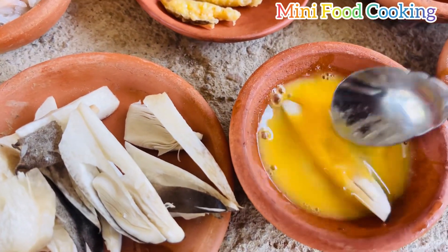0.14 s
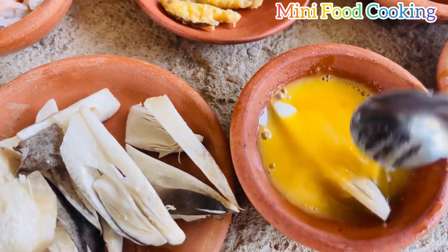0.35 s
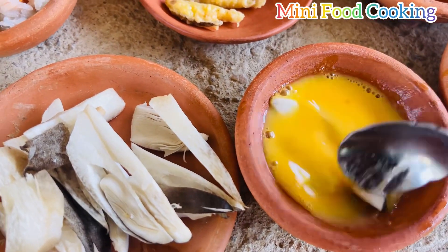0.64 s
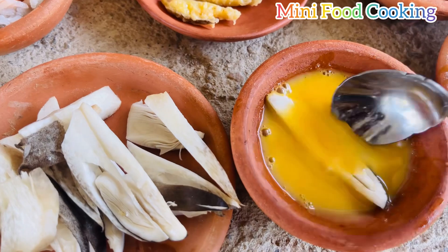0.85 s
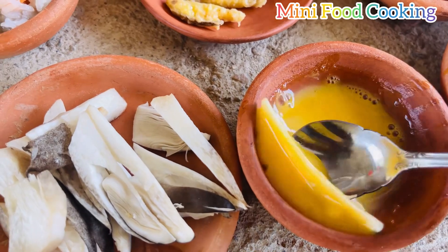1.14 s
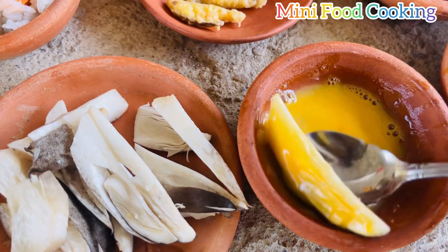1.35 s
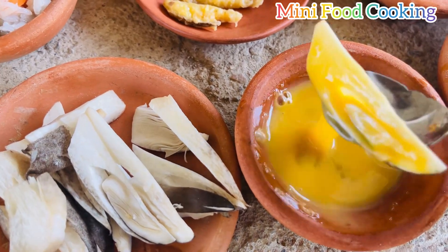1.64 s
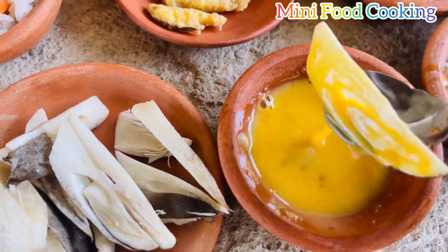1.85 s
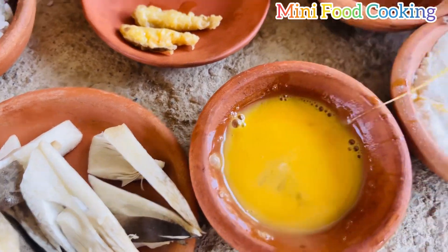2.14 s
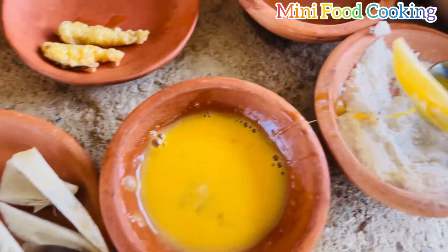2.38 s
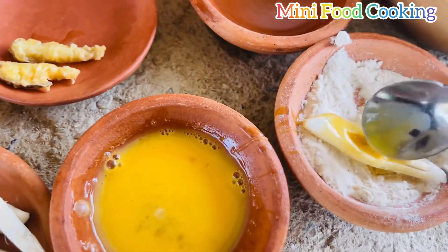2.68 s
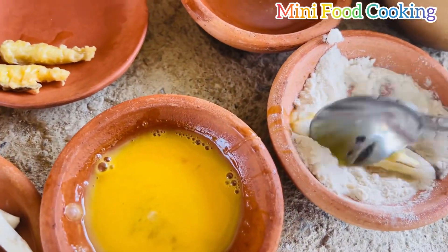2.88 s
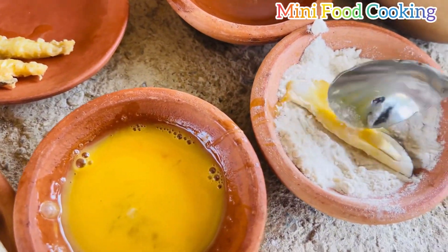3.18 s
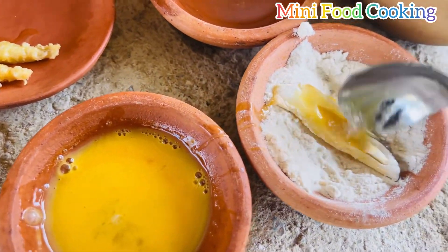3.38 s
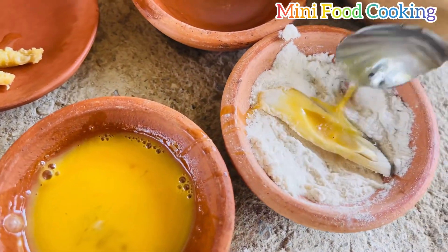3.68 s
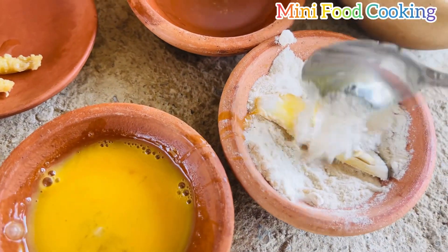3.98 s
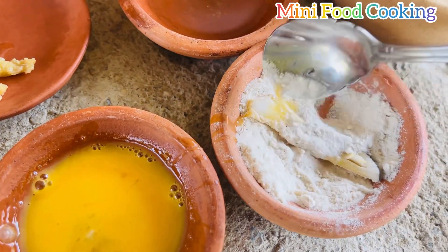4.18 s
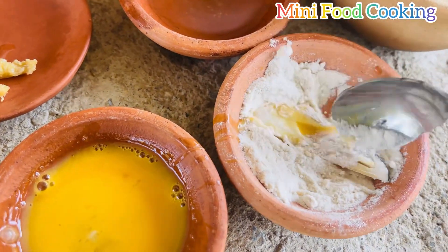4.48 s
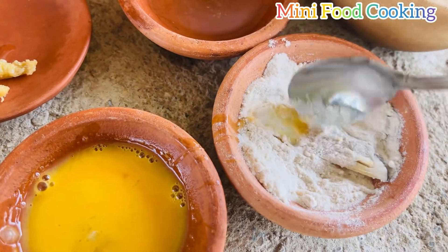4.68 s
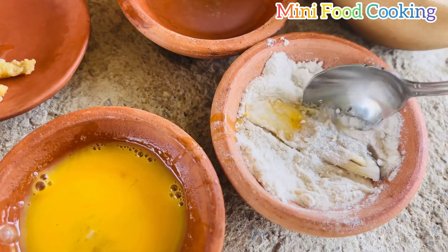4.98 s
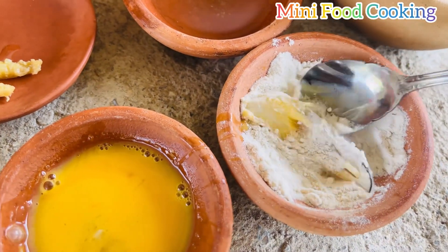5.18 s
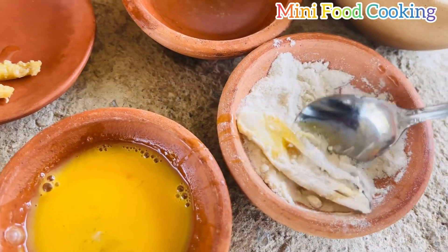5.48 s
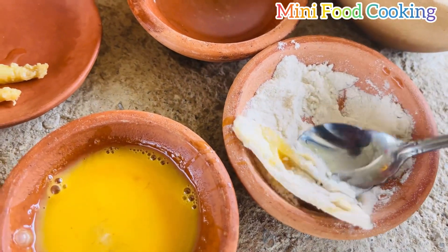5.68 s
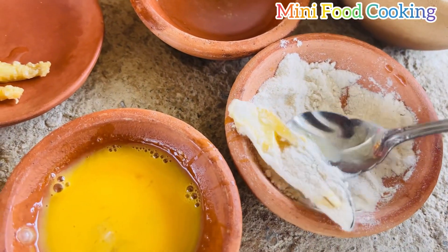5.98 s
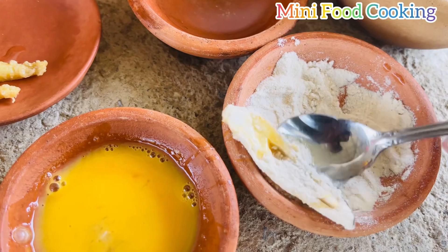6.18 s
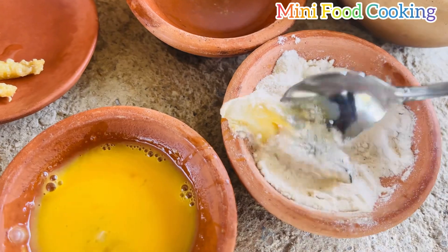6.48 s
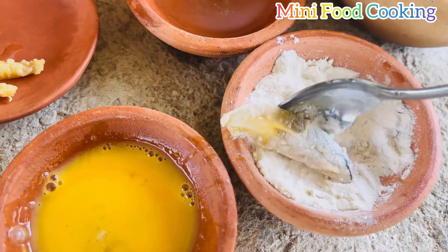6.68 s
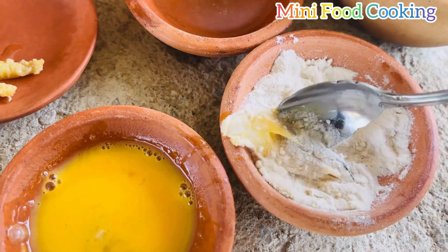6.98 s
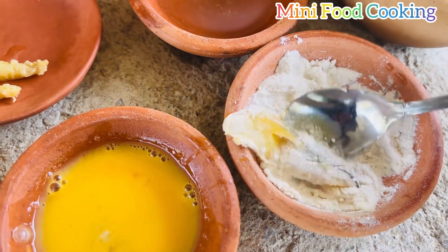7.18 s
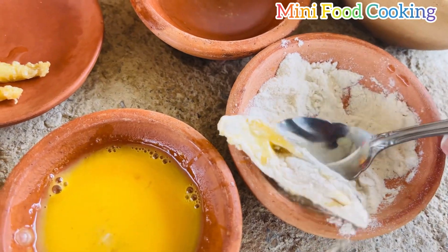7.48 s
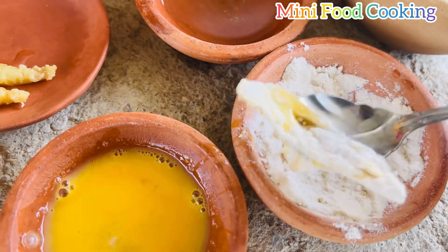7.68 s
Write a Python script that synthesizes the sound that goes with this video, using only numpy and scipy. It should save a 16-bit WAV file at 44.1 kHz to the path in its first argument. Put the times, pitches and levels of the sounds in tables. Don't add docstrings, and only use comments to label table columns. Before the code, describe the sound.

A wide outdoor stereo scene of many birds in woodland, some close and clear, others deep in leaves. Piercing whistles come first, then repeated slurred chirps on the left, scattered softer notes, a burst of strong calls midway, an even trill and a last few high whistles. Distant birdsong swells and fades over a soft leafy hiss; frog croaks are almost buried. The sound is thin, without bass.

```python
import sys
import numpy as np
from scipy import signal
from scipy.fft import rfft, irfft, next_fast_len
from scipy.io import wavfile
from scipy.ndimage import uniform_filter1d

SR = 44100
rng = np.random.default_rng(int(sys.argv[2]) if len(sys.argv) > 2 else 0)


def output_pcm(signal):
    pcm = np.clip(np.atleast_2d(signal).T, -1, 1) * 32767
    wavfile.write(sys.argv[1], SR, np.round(pcm).astype(np.int16))


def invert_db(x):
    u = np.asarray(x, float) / 20
    return 10 ** u


N = 345744

LEFT_PAN_DB, FRONT_PAN_DB, AHEAD_PAN_DB, RIGHT_PAN_DB = 9, 1, -2, -8.5
BURR = .012


def rms_one(x):
    return x / np.sqrt(np.mean(x ** 2) + 1e-20)


def add(bus, start_s, sound, pan_db):
    at = max(round(start_s * SR), 0)
    sound = sound[:max(N - at, 0)]
    ears = invert_db(np.array([[pan_db / 2], [-pan_db / 2]]))
    bus[:, at:at + len(sound)] += sound * ears


def whistle(s, hz, db, fade_s, warble=0., burr=0., depth=0.):
    s = np.sort(s)
    t = s[0] + np.arange(int((s[-1] - s[0]) * SR)) / SR
    pitch = np.interp(t, s, hz)
    pitch = uniform_filter1d(pitch, size=max(len(t) // 16, 1), mode="nearest")
    waver = np.sin(2 * np.pi * 71 * t + hz[0]) * np.sin(2 * np.pi * 23 * t + hz[-1])
    flutter = np.interp(t, s, depth * np.ones(len(s))) * np.sin(2 * np.pi * warble * t)
    pitch = pitch * (1 + flutter + 2.3 * burr * waver)
    ends = np.clip(np.minimum(t - s[0], s[-1] - t) / fade_s, 0, 1)
    envelope = invert_db(np.interp(t, s, db)) * np.sin(np.pi / 2 * ends) ** 2
    return envelope * np.sin(2 * np.pi * np.cumsum(pitch) / SR)


def song(shape, calls, pan_db, pitch=1):
    bus = np.zeros((2, N))
    s, hz, db = np.transpose(shape)
    for (start, level_db), factor in zip(calls, pitch * np.ones(len(calls))):
        note = whistle(s, hz * factor, db + level_db, min(.003, s[-1] / 3))
        add(bus, start + s[0], note, pan_db)
    return bus


# (t/s, length/s, f/Hz, level/dB)
LEFT_HELD = [(0.14, 0.12, 5460, -42.5), (.2, .14, 4700, -59.5), (1.5, .2, 4200, -60.5),
             (1.74, .12, 4350, -64), (3.79, .1, 6130, -69), (3.83, .08, 4900, -66.5),
             (2.67, 0.076, 7050, -62.5), (3.11, 0.071, 2760, -60.5), (3.23, 0.042, 4600, -72.5),
             (2.0, 0.23, 2900, -65.5), (2.12, 0.12, 3300, -69.5), (1.0, 0.041, 1980, -71.5),
             (2.34, .14, 6865, -64), (.3, 0.11, 3560, -58.5), (4.33, .02, 8800, -63),
             (3.73, 0.2, 4450, -61.5), (3.99, 0.15, 4860, -57.5), (4.03, .1, 5200, -57),
             (4.33, 0.31, 8855, -70.5), (4.68, 0.079, 3370, -45), (4.82, 0.05, 3550, -47.5),
             (4.77, 0.045, 3420, -53), (4.88, 0.046, 3500, -52.5), (5.69, 0.11, 4240, -57.5),
             (5.91, 0.085, 6200, -62), (7.07, .1, 5070, -65), (6.57, 0.046, 4600, -56.5),
             (6.85, .1, 5100, -62), (7.47, 0.064, 4550, -62), (7.67, .15, 3880, -67.5),
             (8.1, 0.11, 3650, -61.5), (7.25, 0.11, 3700, -59.5)]
FRONT_HELD = [(0.0, 0.03, 7130, -41), (0.74, 0.075, 2750, -49), (2.33, 0.051, 3000, -56.5),
              (2.39, 0.09, 3030, -52), (2.5, .1, 2980, -58.5), (3.35, 0.22, 3582, -55.5),
              (3.86, 0.13, 4090, -51.5), (4.0, .14, 4100, -60), (3.89, 0.039, 6170, -58.5),
              (3.91, 0.029, 6660, -61), (4.14, 0.067, 6980, -55), (4.357, 0.012, 8000, -44),
              (4.38, 0.15, 8000, -64.5), (0.015, .04, 4540, -64.5), (.17, 0.075, 2880, -53.5),
              (5.775, 0.014, 3430, -52), (4.77, 0.07, 6590, -48), (5.41, 0.071, 3166, -47),
              (6.64, 0.12, 4275, -54.5), (6.73, 0.046, 3060, -51.5), (6.83, 0.14, 3690, -54),
              (7.0, 0.077, 2386, -63), (7.0, 0.16, 3006, -57), (7.42, .11, 2964, -56.5),
              (7.625, 0.05, 6900, -58), (7.72, 0.039, 2790, -59), (7.77, 0.073, 2980, -59)]
RIGHT_HELD = [(0.8, 0.093, 3610, -55.5), (1.0, 0.13, 4200, -60), (1.01, 0.072, 3167, -52.5),
              (1.32, .04, 3360, -51), (1.36, 0.072, 2950, -51), (1.8, 0.092, 3175, -56.5),
              (1.675, .045, 3610, -57), (3.0, 0.037, 5480, -54.5), (4.01, 0.039, 5186, -43),
              (5.86, 0.15, 3420, -53)]
# (t/s, length/s, first f/Hz, last f/Hz, level/dB)
LEFT_SETTLING = [(0.49, 0.15, 7100, 6800, -60), (1.634, 0.58, 9000, 7507, -71),
                 (2.27, 0.13, 7040, 6690, -59.5), (2.27, 0.12, 7640, 7580, -68),
                 (3.0, .15, 3302, 3498, -52.5), (3.05, 0.098, 3786, 3540, -51.5),
                 (3.172, 0.089, 3316, 3588, -44), (3.017, 0.087, 3790, 4010, -61.5),
                 (3.302, 0.035, 3332, 4330, -50), (3.354, .15, 4200, 4340, -59),
                 (4.104, 0.11, 6850, 6580, -59.5), (4.443, 0.23, 2468, 2887, -63),
                 (6.79, 0.11, 5480, 5140, -60.5), (6.93, 0.47, 9140, 7550, -70),
                 (7.031, 0.06, 5450, 5110, -60.5), (7.017, .3, 4637, 4483, -60),
                 (7.05, 0.21, 4090, 4340, -58)]
FRONT_SETTLING = [(3.052, 0.15, 7750, 6955, -70), (4.403, 0.086, 5345, 6286, -33.5),
                  (4.486, 0.064, 6340, 5883, -38.5), (4.737, 0.055, 5950, 7020, -38),
                  (4.769, 0.082, 7210, 7700, -43.5), (4.905, 0.025, 4260, 4600, -36.5),
                  (6.563, 0.015, 6100, 6870, -37), (6.57, 0.095, 6830, 6136, -35),
                  (7.552, 0.13, 2207, 2437, -63.5), (.045, .17, 4420, 4130, -55.5),
                  (5.53, .03, 6500, 7400, -50)]
RIGHT_SETTLING = [(0.029, 0.058, 6020, 5410, -31), (0.346, 0.023, 4820, 6640, -47),
                  (0.362, 0.037, 6720, 6176, -38.5), (3.72, 0.42, 8720, 7330, -62.5),
                  (2.723, 0.034, 4700, 6780, -50), (5.864, 0.016, 6450, 7000, -52)]
# (t/s, length/s, first f/Hz, last f/Hz, level/dB)
LEFT_EVEN = [(0.277, 0.0097, 5860, 3740, -54), (0.697, 0.046, 2797, 2390, -49.5),
             (2.096, 0.17, 7630, 7070, -72.5), (2.749, 0.043, 2800, 2224, -53),
             (2.793, 0.074, 8000, 7980, -65.5), (2.896, .08, 3205, 3535, -64.5),
             (3.327, .024, 4274, 3680, -46.5), (3.302, 0.086, 5910, 5090, -57),
             (3.404, 0.037, 5020, 5040, -60), (3.535, .09, 5960, 5060, -58),
             (2.775, 0.046, 2135, 1727, -72), (4.225, 0.15, 7880, 8080, -62), (.565, .008, 5600, 9000, -60),
             (.712, .008, 5600, 8600, -62), (7.267, 0.073, 8444, 8450, -54.5),
             (7.316, 0.084, 8400, 7940, -53.5), (7.521, 0.015, 5320, 8930, -60)]
FRONT_EVEN = [(0.0, 0.035, 2974, 2694, -45), (4.691, .13, 8660, 7880, -70.5),
              (4.924, 0.035, 4664, 3937, -31), (5.012, 0.036, 4625, 4047, -36.5),
              (5.018, 0.0094, 5140, 7210, -49.5), (5.878, 0.048, 7040, 5980, -45),
              (6.495, 0.025, 8890, 6980, -70), (7.27, 0.19, 4070, 4236, -48)]
RIGHT_EVEN = [(0.005, 0.019, 2537, 2170, -51), (.035, .014, 2642, 2254, -49),
              (0.0, 0.24, 8017, 7410, -57.5), (0.088, 0.03, 5566, 5492, -32), (.115, .022, 5465, 5136, -33),
              (0.175, 0.018, 2513, 2287, -46.5), (0.199, .022, 2524, 2240, -48.5),
              (2.61, 0.046, 7370, 7900, -63.5), (2.65, 0.017, 7140, 6440, -50.5),
              (2.907, 0.028, 6200, 6660, -47.5), (3.956, 0.11, 5580, 5214, -47.5),
              (6.634, 0.31, 8440, 7360, -61), (6.965, .05, 7370, 6950, -66.5)]


def single_notes():
    settle_rate = 2.5
    drift = .008
    burr_top_hz = 3800
    bus = np.zeros((2, N))
    part = np.linspace(0, 1, 9)
    settle = np.expm1(-settle_rate * part) / np.expm1(-settle_rate)
    sides = ((LEFT_HELD, LEFT_SETTLING, LEFT_EVEN, LEFT_PAN_DB),
             (FRONT_HELD, FRONT_SETTLING, FRONT_EVEN, FRONT_PAN_DB),
             (RIGHT_HELD, RIGHT_SETTLING, RIGHT_EVEN, RIGHT_PAN_DB))
    for held, settling, even, pan_db in sides:
        held = [(s, length, hz, hz, db) for s, length, hz, db in held]
        for notes, path in ((held + even, part), (settling, settle)):
            for s, length, first_hz, last_hz, db in notes:
                long = np.clip(length / .1, 0, 1)
                wander = 1 + long * drift * np.sin(5 * part + 40 * s)
                hz = (first_hz + path * (last_hz - first_hz)) * wander
                burr = BURR * long * (1 if hz.mean() < burr_top_hz else .12)
                swell_db = db - 1.7 * np.clip(.5 - part, 0, 1)
                note = whistle(part * length, hz, swell_db, min(0.16 * length, .012), burr=burr)
                add(bus, s, note, pan_db)
    return bus


# (t/s, length/s, f/Hz, level/dB)
CLEAR_HELD = [(1.73, .06, 3090, -54), (1.665, .05, 2740, -58), (4.9, 0.11, 3700, -57.5),
              (4.52, .05, 2830, -57), (4.6, .04, 2850, -62), (4.97, 0.09, 3200, -56),
              (1.42, .02, 4600, -61), (1.68, .07, 4650, -61.5), (1.755, .04, 4900, -63.5),
              (1.7, .13, 3400, -65), (2, 0.033, 3950, -60), (1.85, .11, 4100, -64.5),
              (1.73, .12, 3400, -63.5), (2.37, .12, 2780, -57.5), (2.4, .1, 2930, -59.5),
              (2.26, .07, 2980, -64), (1.43, .1, 2900, -61), (2.8, 0.014, 2300, -70),
              (2.585, .012, 6300, -63), (6.66, .04, 3300, -59), (7.0, .025, 5830, -60.5),
              (7.47, .2, 4380, -57)]


def clear_notes():
    bus = np.zeros((2, N))
    for s, length, hz, db in CLEAR_HELD:
        fade_s = min(.2 * length, .012)
        note = whistle([0, length], [hz * 1.004, hz * .996], [db, db], fade_s, burr=BURR / 8)
        add(bus, s, note, -2.5)
    return bus


# (t/s, f/Hz, level/dB)
VEE = [(0, 7420, -10), (.012, 6390, -8), (.02, 5546, -1.5), (.03, 5080, -3.5), (.055, 5934, -2),
       (.06, 6326, -39.5), (.102, 5550, -31.5), (.117, 5126, -5.5), (.145, 6430, -14.5)]
# (t/s, level/dB)
VEE_CALLS = [
    (5.051, -27.5),
    (5.22, -31.5),
    (5.393, -27),
    (5.566, -27.5),
]
VEE_PITCH = [1.0, .975, 1.0, .975]


def vee_song():
    return song(VEE, VEE_CALLS, -2, np.array(VEE_PITCH))


# (t/s, f/Hz, level/dB)
RISE = [(0, 3197, -16.5), (.02, 4110, 7), (.027, 4830, 1), (.034, 5480, -3)]
# (t/s, level/dB)
RISE_CALLS = [
    (0.438, -41.5),
    (0.529, -45),
    (0.611, -42),
    (0.707, -43),
]


def rise_song():
    return song(RISE, RISE_CALLS, -1)


# (t/s, f/Hz, level/dB)
SLASH = [(0, 5226, -27), (.013, 7650, -11), (.019, 7860, -16.5), (.0195, 7400, -37.5), (.02, 6700, -13.5),
         (.035, 6600, -1), (.06, 5360, 0), (.08, 4520, -2.5)]
# (t/s, level/dB)
SLASH_CALLS = [
    (0.849, -37.5),
    (0.998, -37.5),
    (1.152, -37.5),
    (1.307, -38.5),
    (7.676, -37.5),
]
SLASH_PITCH = [1.005, 1.0, .985, 1.0, 1.03]


def slash_song():
    return song(SLASH, SLASH_CALLS, 8.5, np.array(SLASH_PITCH))


# (t/s, f/Hz, level/dB)
TRILL = [(0, 5450, -11), (.008, 4795, 2), (.014, 4450, 5), (.021, 3900, 7), (.024, 3760, 3)]


def trill():
    start_s, period_s, strokes = 5.967, .0575, 10
    effort, pitch = rng.standard_normal((strokes, 2)).T
    db = -44.5 + .7 * effort
    pitch = 1 + .006 * pitch
    db[0], db[-1], pitch[-1] = -49.5, -48, .99
    starts = start_s + period_s * np.arange(strokes)
    octave = song(TRILL, list(zip(starts, db - 48)), AHEAD_PAN_DB, 2 * pitch)
    return song(TRILL, list(zip(starts, db)), AHEAD_PAN_DB, pitch) + octave


# (t/s, f/Hz, level/dB)
DIP = [(0, 6454, -1), (.042, 5954, -1), (.084, 6350, 0)]
# (t/s, level/dB)
DIP_CALLS = [
    (6.655, -34),
]


def dip_song():
    return song(DIP, DIP_CALLS, FRONT_PAN_DB)


# (t/s, f/Hz, level/dB)
SWOOP = [(0, 6250, -2), (.022, 5705, 6), (.034, 4800, 2.5), (.048, 3900, -2), (.07, 3325, -5.5)]
# (t/s, level/dB)
SWOOP_CALLS = [
    (4.189, -43),
]


def swoop_song():
    return song(SWOOP, SWOOP_CALLS, AHEAD_PAN_DB)


# (t/s, f/Hz, level/dB)
SEET = [(0, 8535, -6.5), (.05, 8093, -2), (.06, 7900, -4.5), (.07, 7610, -17)]
# (t/s, level/dB)
SEET_CALLS = [
    (0.571, -48),
    (0.719, -48),
    (7.372, -44),
    (7.541, -41.5),
]
SEET_PITCH = [1.0, 1.0, 0.97, 0.98]


def seet_song():
    return song(SEET, SEET_CALLS, 11.5, np.array(SEET_PITCH))


# (t/s, f/Hz, level/dB)
FLICK = [(0, 6467, 3.5), (.02, 7996, 0), (.033, 7730, -6)]
# (t/s, level/dB)
FLICK_CALLS = [
    (5.117, -45),
    (5.287, -50),
    (5.457, -45),
]


def flick_song():
    return song(FLICK, FLICK_CALLS, AHEAD_PAN_DB)


# (t/s, f/Hz, level/dB)
TICK = [(0, 5370, 6.4), (.004, 3700, 11)]
# (t/s, level/dB)
TICK_CALLS = [(4.313, -59), (4.539, -67), (4.568, -61), (4.593, -64), (4.629, -58.5), (4.704, -65)]


def ticks():
    return song(TICK, TICK_CALLS, AHEAD_PAN_DB)


# (t/s, length/s, top f/Hz, level/dB, warble rate/Hz)
ARCHES = [
    (5.456, 0.27, 2685, -52, 94),
    (5.857, 0.2, 3080, -44.5, 66),
    (6.215, .205, 3004, -45, 72),
]
ARCH_FLUTTER = [0.04, 0.12, .11]


def arches():
    foot_hz, swell_db = 1945, 4.5
    bus = np.zeros((2, N))
    part = np.linspace(0, 1, 12)
    for (start, length, top_hz, db, per_s), depth in zip(ARCHES, ARCH_FLUTTER):
        rise = np.sin(np.pi * part) ** .62
        bow = foot_hz + (top_hz - foot_hz) * rise
        level_db = db + swell_db * (rise - 1)
        flutter = depth * (.3 + .7 * rise)
        note = whistle(part * length, bow, level_db, 0.022, per_s, BURR / 2, flutter)
        add(bus, start, note, -8.5)
    return bus


# (t/s, length/s, first f/Hz, last f/Hz, level/dB)
RASPS = [(4.69, .07, 4200, 4100, -46), (4.8, 0.09, 4050, 4500, -53.5), (6.87, 0.12, 3450, 3350, -55),
         (4.73, .11, 3000, 2950, -52.5), (1.45, 0.15, 3500, 3600, -54.5), (1.6, 0.068, 4400, 4400, -60.5),
         (5.45, 0.12, 4300, 4200, -59), (5.15, .17, 4400, 4200, -50.5), (4.17, .08, 3100, 2450, -66),
         (4.7, .17, 2350, 2330, -66.5), (5.13, .12, 2450, 2300, -69), (4.72, .14, 5100, 5250, -64),
         (4.955, .07, 4900, 5500, -55.5), (4.64, .04, 2700, 2650, -59)]


def rasps():
    shake_per_s, shake_share = 110, .04
    bus = np.zeros((2, N))
    for s, length, first_hz, last_hz, db in RASPS:
        note = whistle([0, length], [first_hz, last_hz], [db, db], 0.009, shake_per_s, BURR, shake_share)
        add(bus, s, note, FRONT_PAN_DB)
    return bus


# (t/s, length/s, first f/Hz, last f/Hz, level/dB)
CHIPS = [(1.819, 0.014, 7220, 6130, -64), (2.352, .011, 6990, 3310, -59.5), (2.358, .009, 3310, 2210, -60),
         (2.369, 0.01, 3500, 7020, -59.5), (2.436, .009, 6150, 6990, -51.5),
         (2.363, .006, 4700, 6820, -65.5), (2.431, .005, 8210, 7300, -60), (2.432, 0.0081, 7230, 6060, -46),
         (2.596, 0.012, 3700, 7420, -56)]


def chips():
    bus = np.zeros((2, N))
    for s, length, first_hz, last_hz, db in CHIPS:
        note = whistle([0, length], [first_hz, last_hz], [db, db], 0.42 * length)
        add(bus, s, note, -11.5)
    return bus


# (t/s, f/Hz, level/dB)
PEAK = [(0, 3014, -11.5), (.018, 4140, -1.5), (.026, 4160, 7), (.036, 4000, -6.5), (.045, 3150, -3.5)]
# (t/s, level/dB)
PEAK_CALLS = [
    (1.278, -50.5),
]


def peak_song():
    return song(PEAK, PEAK_CALLS, -10.5)


# (t/s, f/Hz, level/dB)
HOOK = [(0, 4420, -17), (.012, 5700, -1.5), (.025, 6230, 6), (.05, 5854, -2), (.08, 5380, 3),
        (.13, 5410, -11)]
# (t/s, level/dB)
HOOK_CALLS = [
    (2.731, -55),
    (2.914, -54),
]


def hook_song():
    return song(HOOK, HOOK_CALLS, -12.5)


# (t/s, f/Hz, level/dB)
BOW = [(0, 2200, 0.5), (.06, 3300, 1), (.065, 3200, -12), (.1, 3350, -12.5), (.105, 3300, -2.5),
       (.135, 2500, 1.5), (.17, 2150, -3)]
# (t/s, level/dB)
BOW_CALLS = [
    (.94, -60),
]


def bow_song():
    return song(BOW, BOW_CALLS, -10.5)


# (t/s, length/s, pulse rate/Hz, throat f/Hz, level/dB)
CROAKS = [
    (0.557, 0.29, 99, 1380, -81),
    (0.62, 0.3, 108, 1706, -79.5),
    (1.416, 0.31, 122, 1530, -82.5),
    (3.684, 0.74, 79, 1890, -80.5),
    (3.699, 0.36, 70, 1490, -86),
    (4.453, 0.29, 75, 1495, -75.5),
    (7.557, 0.19, 110, 1945, -77),
]


def frogs():
    bus = np.zeros((2, N))
    r = np.exp(-np.pi * 300 / SR)
    for start, length, per_s, hz, db in CROAKS:
        t = np.arange(0, length, 1 / SR)
        pulses = np.diff(np.floor(t * per_s + .15 * np.sin(t * 37)), prepend=0)
        sac = [1, -2 * r * np.cos(2 * np.pi * hz / SR), r * r]
        ring = signal.lfilter([1, 0, -1], sac, pulses)
        ring = signal.lfilter([1], sac, ring)
        croak = invert_db(db) * rms_one(ring) * np.sin(np.pi * t / length)
        add(bus, start, croak, -3)
    return bus


# (low f/Hz, high f/Hz, fade/s)
WOOD_T60_S = [
    (720, 3310, 0.93),
    (2770, 7196, 0.7),
    (5982, 12770, 0.7),
]


def among_trees(dry, direct_db, tail_db):
    t = np.arange(round(1.2 * SR)) / SR
    size = next_fast_len(N + len(t))
    noise = rng.standard_normal((3, len(t)))
    tails = 0
    for low_hz, high_hz, t60 in WOOD_T60_S:
        band = signal.sosfilt(signal.butter(2, [low_hz, high_hz], "band", fs=SR, output="sos"), noise)
        trunks, leaves = invert_db(-60 * t / t60), 2.0 * invert_db(-60 * t / 0.29)
        tails = tails + band * (trunks + leaves) * np.clip(t / 0.00049, 0, 1)
    tails = rfft(tails / np.sqrt(np.sum(tails ** 2) / 3 * 2), size)
    left, right = rfft(dry, size)
    shared = 0.83 * tails[2]
    wet_left = (left + 0.086 * right) * (shared + 1.314 * tails[0])
    wet_right = (right + 0.27 * left) * (shared + 1.0 * tails[1])
    wet = irfft(np.array([wet_left, wet_right]), size)[:, :N]
    return invert_db(direct_db) * dry + invert_db(tail_db) * wet


# (t/s, low voices level/dB, high voices level/dB)
HAZE = [(0.0, -55.5, -54), (.5, -61.5, -56), (1.29, -58.5, -56), (1.901, -66, -67), (2.44, -69.5, -77),
        (3.359, -62, -65.5), (3.75, -72, -62.5), (4.671, -62, -65), (5.06, -60, -51.5), (5.699, -57.5, -61),
        (5.938, -54, -61), (6.242, -55.5, -52.5), (6.861, -66, -66.5), (7.291, -68, -60),
        (7.84, -69.5, -63)]


def far_chorus():
    out = 0
    s, *levels = np.transpose(HAZE)
    for db, (low_hz, high_hz) in zip(levels, ((2550, 3900), (3400, 4800))):
        crowd = np.zeros((2, N))
        for when, pitch, glide, length, side, loud in rng.random((420, 6)):
            middle_hz = low_hz + (high_hz - low_hz) * pitch
            hz = middle_hz * (1 + .09 * (glide - .5) * np.array([-1, 1]))
            note = whistle([0, .03 + .12 * length], hz, [7 * loud] * 2, .01, burr=BURR / 4)
            add(crowd, when * N / SR, note, 14 * (side - .5))
        scattered = among_trees(crowd, direct_db=-18, tail_db=0)
        out = out + invert_db(np.interp(np.arange(N) / SR, s, db) - 2.5) * rms_one(scattered)
    return out


# (f/Hz, level/dB per Hz)
AIR = [(900, -30.5), (1500, -15), (2000, -16.5), (3000, -0.5), (4500, -13), (6000, -17), (8000, -28.5),
       (10000, -46.5)]


def air():
    air_db, pan_db = -82, -2.5
    ears = np.array([[1], [-1]])
    corner_hz, colour_db = np.transpose(AIR)
    hz = np.maximum(np.fft.rfftfreq(N, 1 / SR), 10)
    colour = invert_db(np.interp(np.log(hz), np.log(corner_hz), colour_db))
    mid, side = irfft(rfft(rng.standard_normal((2, N))) * colour, N)
    low = signal.sosfilt(signal.butter(2, [1000, 2000], "band", fs=SR, output="sos"), mid)
    return invert_db(air_db + pan_db / 2 * ears) * (mid + 0.24 * side * ears) / np.std(low)


def scene():
    close = rise_song() + trill() + ticks()
    beside = chips() + hook_song() + bow_song() + peak_song()
    near = single_notes() + clear_notes() + arches() + swoop_song() + dip_song()
    near = near + invert_db(-1) * beside
    hidden = slash_song() + vee_song() + flick_song() + seet_song() + rasps() + frogs()
    in_open = among_trees(near, direct_db=-3, tail_db=0.3)
    in_leaves = among_trees(hidden, direct_db=-4, tail_db=0.78)
    overhead = among_trees(close, direct_db=0.5, tail_db=1.0)
    return beside + overhead + in_open + in_leaves + far_chorus() + air()


def roll_off(x):
    return signal.sosfilt(signal.butter(12, 9150, fs=SR, output="sos"), x)


def record(dry):
    cut = signal.sosfilt(signal.butter(6, [1200, 9400], "band", fs=SR, output="sos"), dry)
    return roll_off(cut)


dry = scene()
out = record(dry)
output_pcm(out)
```